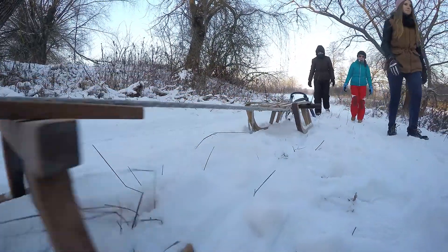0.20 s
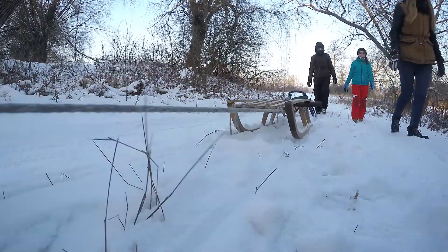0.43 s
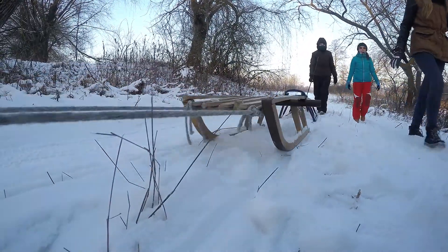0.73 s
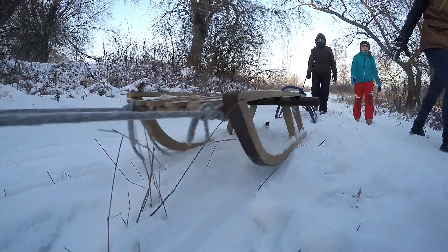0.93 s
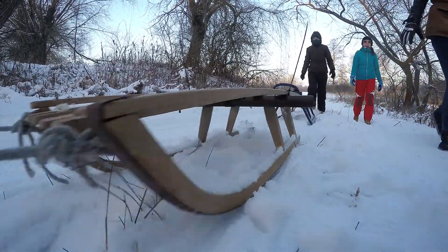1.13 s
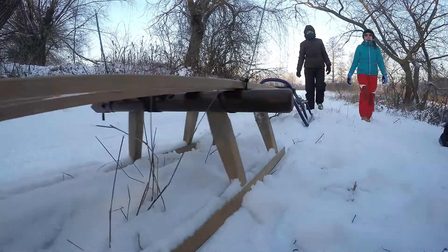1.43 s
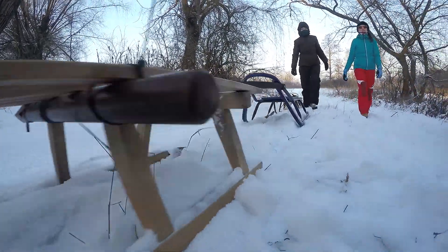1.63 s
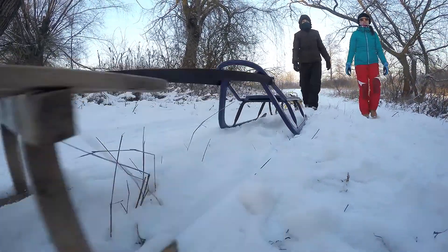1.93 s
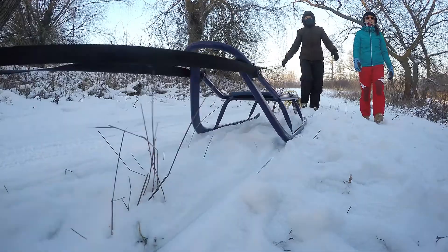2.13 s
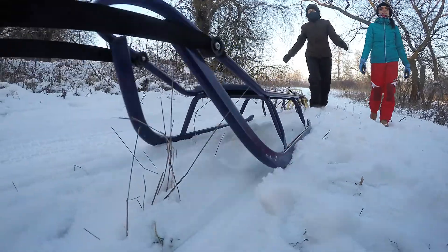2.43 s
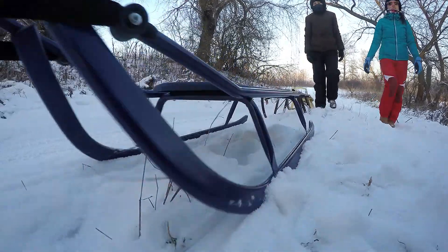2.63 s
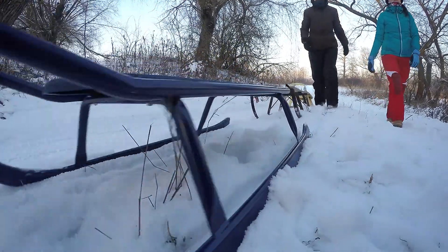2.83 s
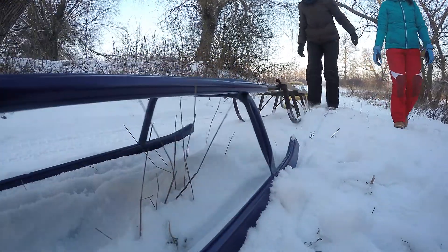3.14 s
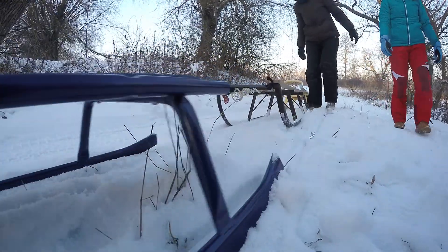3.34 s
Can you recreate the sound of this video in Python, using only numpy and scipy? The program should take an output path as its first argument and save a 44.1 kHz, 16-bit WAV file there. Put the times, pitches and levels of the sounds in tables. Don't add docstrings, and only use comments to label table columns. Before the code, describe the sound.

A sled starts quietly with faint outdoor hiss, low rumble and a tiny twig click near 0.1 s. From 0.4 s the runners grind unevenly over crusty snow, with woody knocks and deep thumps, heaviest around 1.5-1.8 s. After a brief dip near 1.9 s, bright, brittle crunches burst at 2.1-2.5 s. Rougher scraping with a steely edge continues, skipping, then fades after 3.3 s. Close, boxed-in microphone on the sled.

```python
import sys
import numpy as np
from scipy import signal
from scipy.fft import rfft, irfft
from scipy.io import wavfile
from scipy.ndimage import uniform_filter1d

SR = 44100
rng = np.random.default_rng(int(sys.argv[2]) if len(sys.argv) > 2 else 0)


def to_wav(sig):
    pcm = np.clip(np.atleast_2d(sig), -1, 1) * 32767
    pcm = np.round(pcm).astype(np.int16)
    wavfile.write(sys.argv[1], SR, pcm.T)


def field_ratio(decibels):
    return 10 ** (np.asarray(decibels, dtype=float) / 20)


N = 154350

# start_s, level_db, metal_runners_db
PASSING = [
    (0, -54.5, -65.5),
    (1.2, -55, -68),
    (1.9, -48, -61),
    (2.7, -49, -58),
    (3.3, -49.5, -56.5),
    (3.5, -52.5, -57.5),
]
# pitch_hz, level_db
HISS_COLOUR = [(180, -41), (300, -60), (968, -4), (2790, 2.5), (3280, -0.5), (6680, -14), (7620, -19.5),
               (8560, -18), (15500, -21.5)]
# pitch_hz, width_hz, level_db
AIRY = [(2810, 480, 4.5), (7570, 1400, -4), (10450, 1200, -15.5)]
# start_s, runner_pressure_db, crust_hardness_db, ground_lumpiness_db, rail_load_db
DRAG = [(0, -49.5, -9, 6.5, -7), (.2, -40, -14, -2, -9), (.39, -26, -13, 5.5, -9),
        (.46, -33.5, -14, 8, -7.5), (.68, -33, -14.5, 9, -7.5), (.9, -30.5, -14, 11, -8),
        (1.3, -28.5, -17.5, 4, -11.5), (1.5, -17.5, -16, -2, -10.5), (1.66, -20, -11, -5.5, -9),
        (1.82, -27.5, -14.5, 1.5, -8.5), (1.93, -40, -10.5, -0.5, -8), (2.19, -24, -12, -3, -9.5),
        (2.3, -26, -8.5, -2.5, -7), (2.55, -31, -10.5, 5.5, -3.5), (2.84, -30.5, -11.5, -0.5, 0),
        (3.23, -34.5, -11.5, 7.5, -2), (3.38, -46.5, 0, 7, 1), (3.5, -68, 0, -4, 1)]
# contact_returns_s, length_s, depth_db
SKIPS = [(0.147, 0.033, 3), (0.251, 0.01, 13), (0.444, 0.031, 8), (0.517, 0.04, 8.5), (0.675, 0.039, 5.5),
         (.64, 0.016, 4), (1.072, 0.087, 6), (1.17, 0.039, 9), (1.251, 0.023, 5), (1.274, 0.066, 11),
         (1.795, 0.018, 0), (1.899, 0.036, 27), (2.043, 0.09, 2.5), (2.158, 0.0039, 8), (2.345, 0.063, 4.5),
         (2.782, 0.187, 11), (3.086, 0.056, 5.5), (3.125, 0.038, 18.5), (3.348, 0.061, 19),
         (3.404, 0.028, 4), (3.447, 0.014, 16)]
# start_s, level_db
SWAY = [(0.0, -29.5), (0.03, -33), (0.22, -26), (0.29, -39), (0.36, -20.5), (0.69, -25.5), (0.76, -13.5),
        (0.81, -20.5), (1.15, -18), (1.2, -27.5), (1.66, -13.5), (1.7, -26), (2.1, -25.5), (2.14, -22),
        (2.57, -21.5), (2.65, -31), (2.86, -24), (3.5, -39)]
# pitch_hz, width_hz, level_db
MOUNT_MODES = [(29.2, 23, -15), (44, 40, -5), (59.6, 21.5, 3), (73, 57, -13)]
# pitch_hz, width_hz, level_db
FRAME_MODES = [(102, 33, -1), (136.5, 50.6, -2.5), (182.7, 37, -1.5), (222, 8.5, -19), (297.8, 3.4, -7.5)]
# pitch_hz, width_hz, level_db
SLAT_MODES = [(498.7, 56, -10), (867, 312, -7), (987.3, 71, 2), (1205, 195, -5), (1380, 73, -1.5),
              (1473, 180, 0.5), (1594, 43, 1.5), (1681, 68, -3)]
# pitch_hz, width_hz, level_db
SEAT_MODES = [(639.2, 25.3, 0)]
# pitch_hz, width_hz, level_db
RAIL_MODES = [(493, 30, -1.5), (1016, 37, -3), (1424, 120, -6), (1842, 100, 1), (2004, 158, 2.5),
              (2235, 89, -1.5), (2550, 290, -9), (3170, 49, -14.5), (6135, 190, -22.5)]
# pitch_hz, width_hz, level_db
CASE_MODES = [(3200, 210, 7.5), (3604, 430, 5), (4035, 460, 1), (5520, 530, -13), (6250, 500, -10)]
# pitch_hz, width_hz, level_db
PORT_MODES = [(6600, 730, 5.5), (8000, 830, 3), (10550, 730, 0), (12600, 370, -8), (13200, 550, -10),
              (14900, 600, -11)]
# start_s, peak_db
KNOCKS = [(0.054, -38), (0.147, -31), (0.196, -44), (0.283, -32), (0.328, -35), (0.376, -18),
          (0.537, -19.5), (0.685, -26), (0.685, -20.5), (0.749, -25), (0.802, -19), (1.035, -18),
          (1.188, -36), (1.277, -17), (1.367, -24), (1.416, -24), (1.448, -16.5), (1.637, -13.5),
          (1.759, -18.5), (2.009, -27), (2.047, -20), (2.094, -26), (2.126, -31), (2.392, -36),
          (2.469, -26), (2.709, -39), (2.786, -28), (2.837, -21), (2.937, -23), (2.996, -22.5),
          (3.155, -26), (3.153, -20), (3.201, -21), (3.362, -29)]
# start_s, peak_db
BUMPS = [(.067, -38), (0.178, -24), (0.201, -22.5), (0.338, -21), (0.455, -20), (0.483, -23.5),
         (0.736, -23), (0.943, -32), (1.051, -24), (1.12, -18), (1.381, -17), (1.51, -12.5), (1.612, -15),
         (1.64, -13), (1.756, -19.5), (1.83, -18.5), (2.147, -21), (2.213, -14.5), (2.235, -16.5),
         (2.408, -18.5), (2.478, -27), (2.548, -26), (2.822, -29), (2.89, -21), (3.14, -24.5),
         (3.168, -23.5), (3.281, -27.5), (3.361, -27)]
# start_s, peak_db, brightness_db, length_s
SNAPS = [(0.112, -19.5, -2, 0.0062), (0.191, -22.5, 1, 0.011), (.241, -24, 7.5, 0.0046),
         (.262, -33, 12, .005), (0.335, -31, 14, 0.012), (0.528, -38, 16, 0.015), (0.746, -33, -5, 0.0092),
         (0.79, -17.5, 0, 0.012), (0.821, -20, 2, 0.022), (0.857, -21.5, -5, 0.039), (0.515, -31, 9, 0.009),
         (1.078, -17.5, -6, 0.034), (1.146, -27, -17, 0.0079), (1.28, -18, -3.5, 0.09),
         (1.768, -22.5, 17, 0.0075), (1.942, -26.5, 9, 0.028), (2.068, -25, 7, .006),
         (2.073, -25, 15, 0.0085), (2.108, -28, 19, 0.0089), (2.125, -23.5, 16.5, 0.0074),
         (2.16, -16.5, 14.5, 0.015), (2.176, -13, 13.5, 0.0072), (2.185, -8.5, 11.5, 0.007),
         (2.2, -11.5, 10, 0.015), (2.219, -13.5, 5, 0.0093), (2.232, -17.5, 17, 0.0074),
         (2.269, -23, 14.5, 0.008), (2.342, -25, 11, 0.072), (2.391, -19, 11, 0.01),
         (2.409, -12.5, 8.5, 0.012), (2.441, -17.5, 11.5, 0.032), (2.462, -23, 11, 0.0048),
         (2.507, -16, 7.5, 0.028), (2.615, -32, 17, 0.0054), (2.828, -20.5, 7, 0.053),
         (2.97, -20, -19, 0.025), (3.111, -24, -10, 0.0094), (3.134, -22.5, -9, 0.019),
         (3.17, -21.5, 6, 0.024), (3.187, -20, 1, 0.03), (3.224, -18.5, 4, 0.022),
         (3.341, -27.5, -5, 0.0092), (3.372, -20.5, 5, 0.0049), (3.415, -29.5, 4.5, 0.013),
         (3.446, -25.5, 2.5, 0.0083)]
# pitch_hz, side_minus_mid_db
WIDTH = [(60, -48.5), (110, -61), (200, -42.5), (380, -25), (700, -31), (1290, -28.5), (2380, -27),
         (4400, -24), (8120, -18.5), (15000, -17)]

TWIG_S = 0.112


def level(x, db=0):
    return x * field_ratio(db) / np.sqrt(np.mean(x ** 2))


def curve(t, table, column=1):
    points = np.array(table)
    return np.interp(t, points[:, 0], points[:, column])


def walk(rate_hz):
    hold = int(SR / rate_hz)
    steps = np.repeat(rng.standard_normal(N // hold + 1), hold)
    return 1.29 * uniform_filter1d(uniform_filter1d(steps, hold), hold)[:N]


def colour(x, points):
    hz, db = np.array(points).T
    f = np.fft.rfftfreq(N, 1 / SR) + 1
    return irfft(rfft(x) * field_ratio(np.interp(np.log(f), np.log(hz), db)), N)


def ring(x, modes):
    n, skirt = 2 ** 18, 1.773
    f = np.fft.rfftfreq(n, 1 / SR) + 1e-3
    power = np.zeros(len(f))
    for hz, width_hz, db in modes:
        detune = (f - hz ** 2 / f) / width_hz
        power += field_ratio(db) ** 2 / (1 + detune ** 2) ** skirt
    cepstrum = irfft(np.log(power / power.mean() + 1e-14) / 2)
    cepstrum[1:n // 2] *= 2
    cepstrum[n // 2 + 1:] = 0
    return irfft(rfft(x, n) * np.exp(rfft(cepstrum)))[:N]


def even(x, window_s, share):
    power = uniform_filter1d(x ** 2, int(window_s * SR)) + 1e-12
    return level(x / power ** (share / 2))


def grains():
    grains_per_s, spread_db, powder = 2500, 4.5, 0.75
    hit = rng.random(N) < grains_per_s / SR
    size_db = spread_db * np.minimum(rng.exponential(size=N), 4)
    crack = hit * rng.choice([-1, 1], N) * field_ratio(size_db)
    return level(level(crack) + powder * rng.standard_normal(N))


def click(t, decay_s):
    return (t >= TWIG_S) * np.exp(-np.maximum(t - TWIG_S, 0) / decay_s)


def outdoor_air(t, powder):
    hiss = level(colour(rng.standard_normal(N), HISS_COLOUR))
    hiss = hiss * field_ratio(curve(t, PASSING) + 0.28 * walk(4.9))
    runners = field_ratio(curve(t, PASSING, column=2)) * ring(grains(), AIRY)
    twig = field_ratio(-40.5) * click(t, decay_s=0.001) * np.diff(powder, prepend=0)
    return hiss + runners + twig


def skip_lift_db(t):
    leave_s, shortest_land_s, land_share = 0.013, 0.0016, 0.19
    lift = np.zeros(N)
    for returns_s, length_s, depth_db in SKIPS:
        leaving = np.clip((t - returns_s + length_s) / leave_s + 0.5, 0, 1)
        landing = np.clip((returns_s - t) / max(shortest_land_s, land_share * length_s), 0, 1)
        lift -= depth_db * leaving * landing
    return lift


def mount(t, lumps, kicks, lift):
    sway_db = curve(t, SWAY) - 1.5 + 0.31 * lift
    sway = even(ring(lumps, MOUNT_MODES), window_s=0.0304, share=0.39)
    return field_ratio(sway_db) * sway + ring(kicks, MOUNT_MODES)


def slats(rub, grit, soft_snap):
    drive = field_ratio(rub - 4 + 0.8 * walk(17)) * grit
    return ring(drive + soft_snap, SLAT_MODES)


def seat(rub, load, grit, soft_snap):
    drive = field_ratio(rub - 21 - 0.9 * load) * grit
    return ring(drive + field_ratio(-20.5) * soft_snap, SEAT_MODES)


def rails(rub, load, grit, snap):
    drive = field_ratio(rub - 2.5 + load + 0.8 * walk(31)) * grit
    return ring(drive + field_ratio(-13) * snap, RAIL_MODES)


def case(rub, hard, grit, fine, bright_snap):
    drive = field_ratio(rub + hard + 0.8 * walk(22)) * (0.46 * grit + 0.58 * fine)
    return ring(drive + field_ratio(-15) * bright_snap, CASE_MODES)


def port(rub, hard, powder, bright_snap):
    drive = field_ratio(rub + hard - 23 + 3.1 * walk(22.65)) * powder
    return ring(drive + field_ratio(-31.5) * bright_snap, PORT_MODES)


def frame(t, lumps, kicks, shake_db, lift):
    rise_s, fall_s = 0.0052, 0.024
    start_s, peak_db = np.array(KNOCKS).T[:, :, None]
    age = np.maximum(t - start_s, 0)
    swell = np.minimum(age / rise_s, 1) * np.exp(-(age / fall_s) ** 2)
    shudder = (field_ratio(peak_db - 4) * swell).max(axis=0) * field_ratio(0.6 * lift)
    rumble = even(ring(lumps, FRAME_MODES), window_s=0.0295, share=0.88)
    wood = np.hypot(field_ratio(shake_db - 3.5), shudder) * rumble
    return wood + ring(field_ratio(-13.5) * kicks, FRAME_MODES)


def bump_kicks(t):
    kicks = np.zeros(N)
    for start_s, peak_db in BUMPS:
        kicks[int(start_s * SR)] = -field_ratio(peak_db + 3)
    impulse = 1.0 * (t == 0)
    return kicks / np.abs(ring(impulse, MOUNT_MODES)).max()


def snaps(t):
    rise_s = 0.00068
    noise = level(rng.standard_normal(N) + 0.51 * grains())
    soft, bright = np.zeros(N), np.zeros(N)
    for start_s, peak_db, bright_db, length_s in SNAPS:
        age = np.maximum(t - start_s, 0)
        burst = np.minimum(age / rise_s, 1) * np.exp(-(age / length_s) ** 2) * field_ratio(peak_db - 13)
        soft += burst
        bright += burst * field_ratio(bright_db)
    twig = field_ratio(-18.5) * click(t, decay_s=0.00057)
    return soft * noise, (bright + twig) * noise


def stereo(mid):
    smear = rng.standard_normal(2048) * np.exp(-np.arange(2048) / 500)
    smeared = signal.fftconvolve(mid, smear / np.linalg.norm(smear))[:N]
    patches_db = -5.5 + 12 * np.minimum(walk(40.07), 0.9)
    side = colour(smeared, WIDTH) * field_ratio(patches_db)
    return np.array([mid + side, mid - side])


def scene():
    t = np.arange(N) / SR
    press, hard, lumpy, load = (curve(t, DRAG, column=k) for k in (1, 2, 3, 4))
    lift = skip_lift_db(t)
    rub = press + lift + walk(45.01) + 0.5 * walk(160)
    hard = hard - 0.17 * lift
    grit, fine, powder = grains(), grains(), grains()
    soft, bright = snaps(t)
    lumps = rng.standard_normal(N) * field_ratio(2 * walk(7.5))
    kicks = bump_kicks(t)

    body = mount(t, lumps, kicks, lift) + frame(t, lumps, kicks, press + lumpy + lift, lift)
    body += slats(rub, grit, soft) + seat(rub, load, grit, soft) + rails(rub, load, grit, soft + bright)
    body += case(rub, hard, grit, fine, bright) + port(rub, hard, powder, bright)

    notch_hz, notch_width_hz = 425.6, 300
    b, a = signal.iirnotch(notch_hz, notch_hz / notch_width_hz, SR)
    valley = body - signal.lfilter(b, a, body)
    return stereo(body - 0.73 * valley + outdoor_air(t, powder))


def band_limit(x):
    return signal.sosfilt(signal.butter(12, 15500, fs=SR, output="sos"), x)


def record(dry):
    return band_limit(dry)


dry = scene()
out = record(dry)
to_wav(out)
```